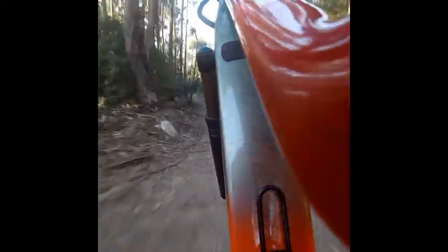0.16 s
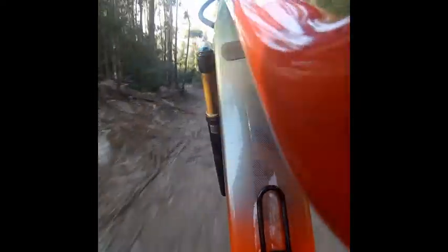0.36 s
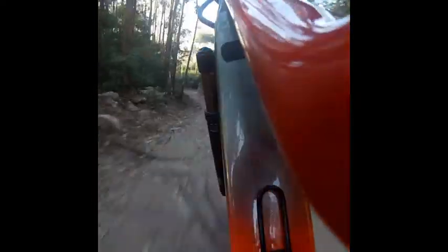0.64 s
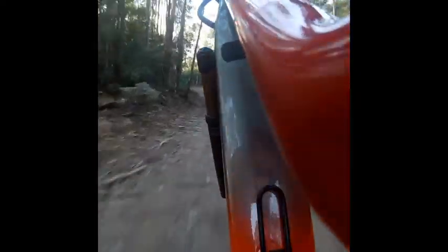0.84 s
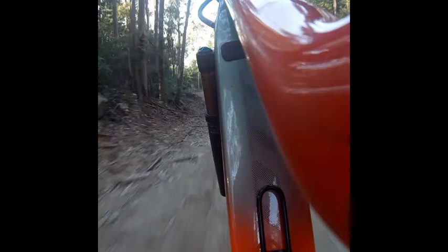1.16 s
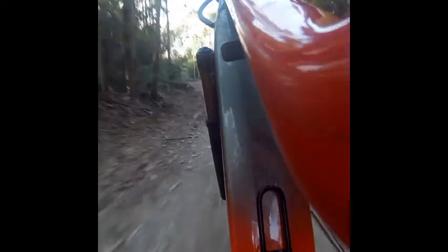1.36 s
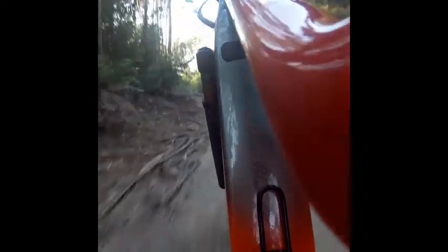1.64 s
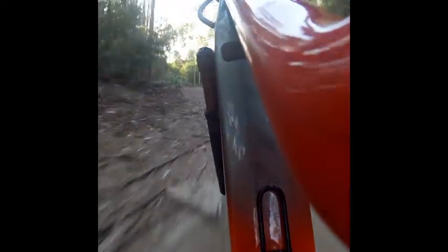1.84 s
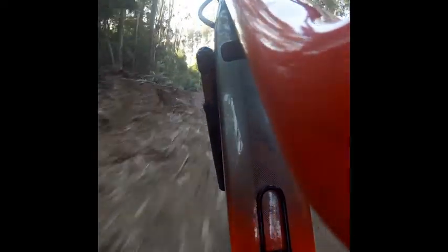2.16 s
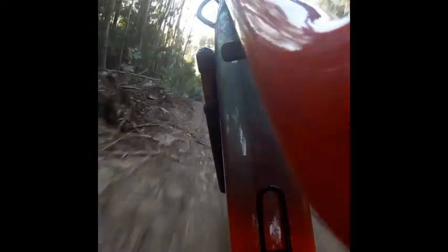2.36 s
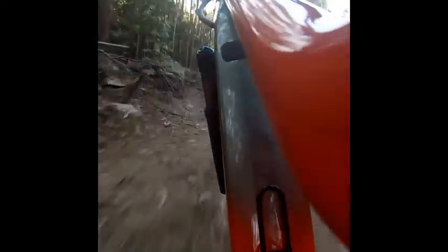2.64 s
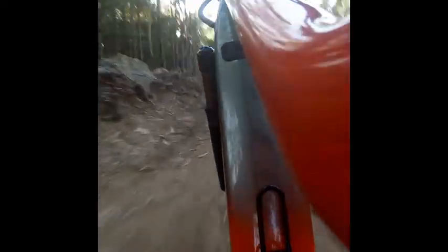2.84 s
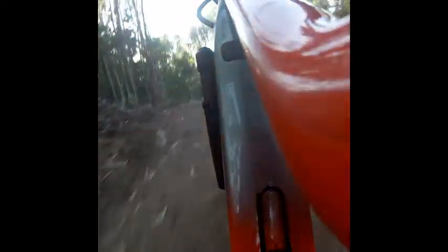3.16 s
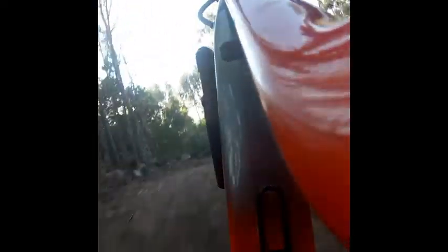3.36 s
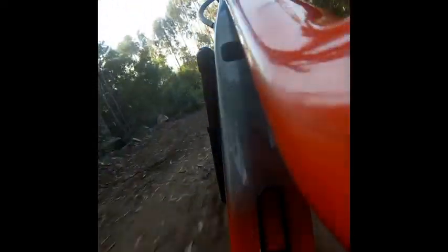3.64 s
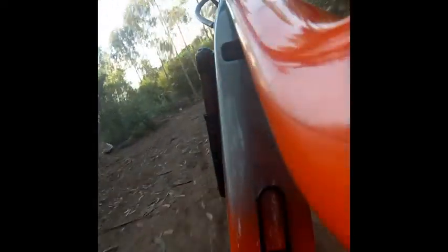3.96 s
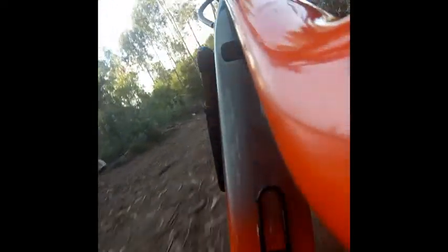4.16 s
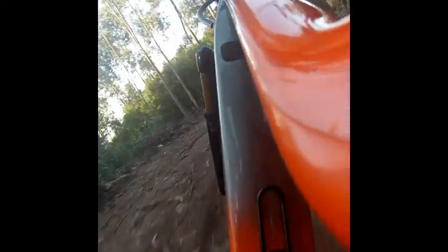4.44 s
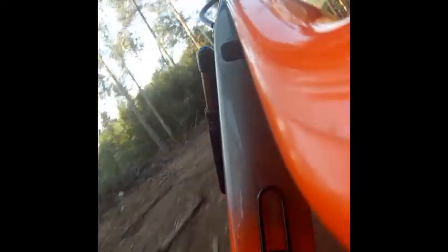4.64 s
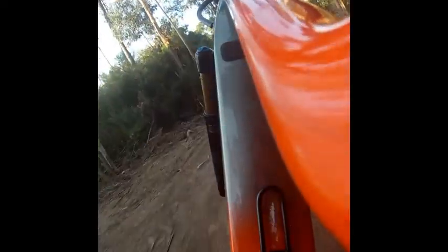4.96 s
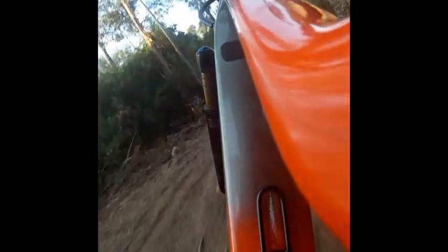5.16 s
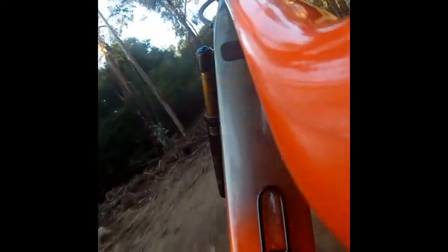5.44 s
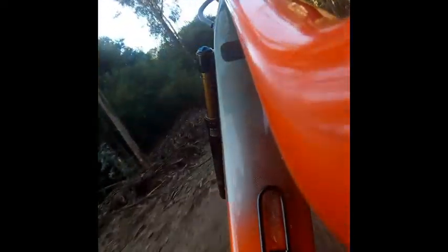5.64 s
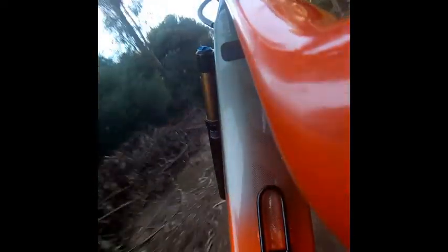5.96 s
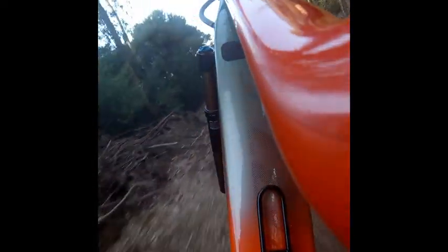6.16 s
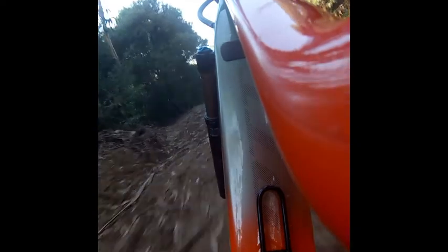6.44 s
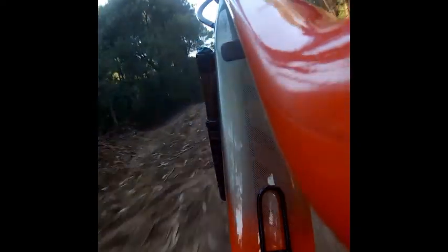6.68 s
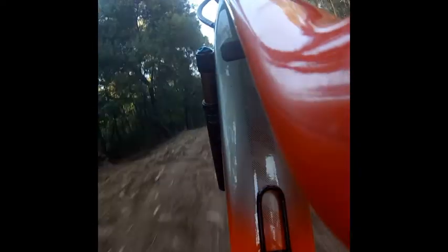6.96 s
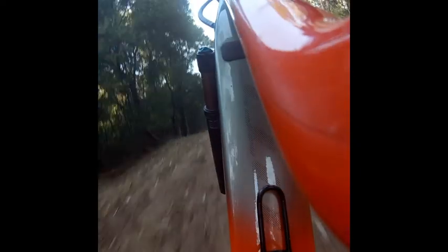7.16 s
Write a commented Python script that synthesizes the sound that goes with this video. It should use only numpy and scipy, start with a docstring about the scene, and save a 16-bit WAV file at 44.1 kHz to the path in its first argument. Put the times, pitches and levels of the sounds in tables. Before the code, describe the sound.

A mountain bike runs fast down a stony forest trail, heard from a closed microphone case on the frame. Low tyre rumble, gravel crunch and spraying grit dominate, with dense dull knocks and clicks. A hard thump hits the case around three seconds; the tyres go light, scuff the dirt twice, then roll on more quietly with snapping debris and a last rougher stretch.

```python
"""Tyres rumble and crunch over stones as a mountain bike runs down a rough dirt trail.
Random stone contacts and soil noise, shaped by filters, make the rolling; grit sprays the frame.
Bumps knock the bike, loose parts click, and debris snaps: short pushes, noise bursts and dying rings.
After a light moment over a crest both tyres scuff the dirt; one hard jolt thumps the case itself.
All of it is heard by one microphone in a closed case on the frame, over a faint hiss."""
import sys
import numpy as np
from scipy import signal
from scipy.fft import rfft, irfft, next_fast_len
from scipy.io import wavfile
from scipy.ndimage import map_coordinates

SR = 44100
rng = np.random.default_rng(int(sys.argv[2]) if len(sys.argv) > 2 else 0)


def to_wav(sig):
    """Store sig (one row per channel, or 1-D mono) as 16-bit WAV at the path in sys.argv[1].

    Samples outside -1..1 are clipped; the rate is SR.
    """
    pcm = np.clip(np.atleast_2d(sig), -1, 1) * 32767
    pcm = np.round(pcm).astype(np.int16)
    wavfile.write(sys.argv[1], SR, pcm.T)  # frames by channels


N = 322371

# Filter for fine grit. Each row: frequency in Hz, gain in dB.
GRIT_TONE = [(1000, -44.5), (1700, -3), (2800, -4), (4200, -10), (5900, -29), (7000, -41), (8500, -41.5),
             (10000, -51), (13000, -57.5), (16000, -77.5)]
# Roots and rocks that knock the frame.
# Each row: time in seconds, level in dB before the shared knock gain, hardness from 0 to 1.
OBSTACLES = [(0.077, -7, 0.33), (0.117, -9.5, 0.3), (0.2245, -13.5, .7), (0.325, -14.5, 0.83),
             (0.4777, -7.5, 0.27), (0.602, -8, .3), (0.647, -9.5, 0.9), (0.7143, -7.5, 0.55),
             (1.261, -9, 0.06), (1.567, -9, 0.9), (1.6465, -7.5, 0), (1.6678, -8.5, 0.3), (2.127, -9, 0.5),
             (2.146, -8, 0.3), (2.4249, -16, 0.97), (2.572, -8.5, 0.2), (2.5871, -6.5, 0.25),
             (2.624, -9, 0.6), (2.6987, -11, 0.3), (2.718, -10, 0.55), (2.763, -8.5, 0.4),
             (3.136, -11.5, 0.5), (3.41, -17.5, .1), (3.4635, -18, 0.6), (3.778, -19.5, 0.1),
             (3.917, -13.5, 0.1), (4.117, -14, 0.5), (4.924, -20, 0), (5.0933, -15.5, 0.1),
             (5.586, -17.5, 0.4), (5.932, -14, 0.02), (6.18, -14.5, 1), (6.628, -18.5, 0.15),
             (6.7657, -17, 0.3), (6.803, -15, 0.3), (6.884, -13.5, 0.8), (6.9224, -12, 1),
             (6.9955, -10.5, 0.27), (7.082, -16, .4), (7.1113, -17, 0.1)]
# Filter for the crack of a hard rock or of snapping debris. Each row: frequency in Hz, gain in dB.
CRACK_TONE = [(400, -18.5), (1300, 9.5), (2600, -2.5), (4000, -15.5), (5500, -30.5), (7000, -43.5),
              (12000, -66)]

# levels at cruising pace, before the ground changes them
CRUISE_DB, CRUNCH_DB, GRIT_DB = -30, -35, -51.5  # rumble, crunch, grit


def amp(db):
    """Turn decibels into a gain."""
    return 10 ** (np.asarray(db) / 20)


def unit(x):
    """Scale to rms 1."""
    return x / np.sqrt(np.mean(x ** 2) + 1e-20)


def crest(x):
    """Scale to peak 1."""
    return x / (np.abs(x).max() + 1e-20)


def add(track, s, sound):
    """Mix a sound into the track at time s."""
    part = track[max(round(s * SR), 0):][:len(sound)]
    part += sound[:len(part)]


def wobble(rate):
    """A smooth random curve through `rate` random points a second."""
    points = rng.standard_normal(int(N * rate / SR) + 4)
    return unit(map_coordinates(points, [np.arange(N) * rate / SR]))


def curves(rows):
    """One value per sample for each column after the time."""
    s, *columns = np.transpose(rows)
    return [np.interp(np.arange(N) / SR, s, column) for column in columns]


def stretch(start, length, rise_s=0.012, fall_s=0.2):
    """Rise, hold and fall (0-1), as when the tyres roll in and out of a stretch of ground."""
    t = np.arange(N) / SR - start
    rise = np.clip(t / rise_s + .5, 0, 1)
    return rise * np.clip((length - t) / fall_s + .5, 0, 1)


def filtered(x, gain_db):
    """Filter without pre-echo (minimum phase), its gain in dB a function of frequency."""
    m = 2 * next_fast_len(len(x) // 2 + 4096)
    gain = np.maximum(amp(gain_db(np.fft.rfftfreq(m, 1 / SR))), 1e-6)
    cepstrum = irfft(np.log(gain))
    # folding the cepstrum onto positive time makes the filter respond only after its input
    cepstrum[1:m // 2] *= 2
    cepstrum[m // 2 + 1:] = 0
    return irfft(rfft(x, m) * np.exp(rfft(cepstrum)))[:len(x)]


def coloured(x, points):
    """Pass x through a body with the given (Hz, dB) gains."""
    f, db = np.transpose(points)
    return filtered(x, lambda hz: np.interp(np.log(hz + 1), np.log(f), db))


def resonant(x, peaks):
    """Pass x through (Hz, width Hz, dB) peaks and notches."""
    return filtered(x, lambda hz: sum(db / (1 + (2 * (hz - centre) / width) ** 2)
                                      for centre, width, db in peaks))


def scattered(rate, level_db, spread_db):
    """Rows (s, dB) of chance hits, one in each time slot, up to spread_db under a level curve."""
    count = int(rate * N / SR)
    when, weak = rng.random((count, 2)).T
    at = ((np.arange(count) + when) / count * N).astype(int)
    return list(zip(at / SR, level_db[at] - spread_db * weak))


def contacts(rate, spread_db, t60):
    """Random stone contacts of uneven force, each a sharp push and a short dying crackle."""
    count = int(rate * N / SR)
    t = np.arange(SR // 100) / SR
    start = rng.integers(0, N, count)
    force = amp(-spread_db * rng.random(count))
    crackle = rng.standard_normal((count, len(t))) * amp(-60 * t / t60)
    crackle[:, 0] += 4.4 * rng.choice([-1, 1], count)  # the first push, either way
    index = start[:, None] + np.arange(len(t))
    return unit(np.bincount(index.ravel(), (force[:, None] * crackle).ravel(), N)[:N])


def pings(rate, centre_hz, spread_db, t60):
    """Flung grains strike hard parts; each rings for a moment at its own pitch."""
    count = int(rate * N / SR)
    t = np.arange(SR // 50) / SR
    when, pitch, force = rng.random((count, 3)).T
    hz = centre_hz * 2 ** (1.6 * (pitch[:, None] - .5))  # spread over 1.6 octaves
    grains = amp(-spread_db * force[:, None]) * np.sin(2 * np.pi * hz * t) * amp(-60 * t / t60)
    index = (when[:, None] * N).astype(int) + np.arange(len(t))
    return unit(np.bincount(index.ravel(), grains.ravel(), N)[:N])


def rolling(spectrum, stones, soil_db):
    """Stone contacts on a smooth bed of soil noise, heard through the bike."""
    return unit(coloured(stones + amp(soil_db) * rng.standard_normal(N), spectrum))


def tyres(rumble_db, crunch_db, grit_db):
    """Boom, rumble, crunch and grit swell as the tyre load judders, most unevenly at low levels."""
    # Filters for the soft tyres, the frame and crushed gravel. Each row: frequency in Hz, gain in dB.
    boom_tone = [(25, -41), (60, -18), (120, -8.5), (180, 1), (260, -2.5), (450, -30), (1200, -90.5)]
    rumble_tone = [(18, -78), (30, -46.5), (233, -2), (350, -0.5), (495, -1.5), (639, -2), (700, -2.5),
                   (778, -4), (1100, -10.5), (1430, -23), (2420, -120)]
    crunch_tone = [(470, -33.5), (800, -11), (1470, -2.5), (1750, -5), (2820, -18.5), (3400, -26),
                   (4420, -39.5), (7480, -120)]
    # A more hollow tone after the landing. Each row: centre in Hz, width in Hz, gain in dB.
    hollow_tone = [(890, 320, -1), (1436, 280, 1), (5330, 420, -5)]
    hollow_s = 3.65
    judder_db, judder_blurs = 1.47, 0.088  # swing at cruising pace; share lost per dB of rumble
    crunch_judder = 1.3  # gravel and grit answer the load more strongly: dB per dB
    boom_level_db, boom_grows = -47, 0.55  # level at cruising pace; dB gained per dB of rumble

    spurts_db = 1.2 * wobble(24)  # sand flies in spurts
    judder = np.tanh(unit(wobble(42) + 0.7 * wobble(110)))
    above_cruise_db = rumble_db - CRUISE_DB
    load_db = judder_db * np.exp(-judder_blurs * above_cruise_db) * judder  # at speed the bumps blur

    stones = contacts(rate=420, spread_db=14, t60=0.006)
    gravel = contacts(rate=520, spread_db=20, t60=0.004)
    sand = pings(rate=420, centre_hz=5200, spread_db=26.5, t60=0.0036)
    pebbles = pings(rate=220, centre_hz=1785, spread_db=14, t60=0.009)
    crushed = unit(stones + 0.95 * gravel + 0.48 * pebbles)
    flung = unit(0.73 * sand + gravel + 0.45 * stones)

    boom_gain = amp(boom_level_db + boom_grows * above_cruise_db + load_db)
    boom = boom_gain * rolling(boom_tone, stones, soil_db=0.5)
    rumble = amp(rumble_db + load_db) * rolling(rumble_tone, stones, soil_db=1.0)
    crunch_gain = amp(crunch_db + crunch_judder * load_db)
    crunch = crunch_gain * rolling(crunch_tone, crushed, soil_db=2.5)
    grit_gain = amp(grit_db + spurts_db + crunch_judder * load_db)
    grit = grit_gain * rolling(GRIT_TONE, flung, soil_db=0.5)
    roll = boom + rumble + crunch + grit
    return roll + stretch(hollow_s, N / SR) * (resonant(roll, hollow_tone) - roll)


def ground():
    """Levels in dB of rumble, crunch and grit: they grow with pace and on stones, and drop over crests."""
    # The pace of the ride. Each row: time in seconds, rumble level on plain dirt in dB.
    pace = [(0, -28), (2.3, -26.5), (2.9, -28.5), (3.3, -27.5), (3.52, -35.5), (4.3, -33.5), (4.8, -35),
            (5.4, -37.5), (5.78, -35.5), (6.05, -32), (6.42, -35.5), (7.0, -30.5), (7.31, -32.5)]
    # Stony ground. Each row: start in seconds, length in seconds, extra rumble in dB,
    # extra crunch and grit in dB.
    patches = [(0.0, 0.15, 3.5, 2.5), (0.462, 0.25, 3, 3), (0.742, 0.2, 2.5, .5), (1.1, 0.14, 3, 1.5),
               (1.537, 0.18, 2, 4), (2.556, 0.21, 4.5, 5), (2.819, 0.11, 2, 4), (3.048, 0.071, 2, 5),
               (3.168, 0.04, 3.5, 2.5), (3.53, 0.025, 5.5, 1), (4.078, 0.22, 2, 4), (5.074, 0.23, 3, 2.5),
               (6.155, 0.11, 3.5, 8), (6.863, 0.12, 5, 6)]
    # Loose sand thrown up, less on bare ground. Each row: start in seconds, length in seconds,
    # extra grit in dB.
    loose_sand = [(0.007, 0.82, 3.5), (0.907, 1.43, 2.5), (3.47, 0.13, -5.5), (3.658, 0.35, 6),
                  (4.553, 0.45, 5), (7.152, 0.22, 3.5)]
    # The bike goes light over a crest. Each row: landing in seconds, time spent light in seconds,
    # rumble drop in dB.
    crests = [(1.11, 0.096, 1.5), (2.424, 0.065, 4.5), (3.640, 0.083, 3.5), (5.79, 0.065, 2.5),
              (5.997, 0.1, 3.5)]
    unload_s, land_s = 0.055, .012  # the weight leaves the tyres slowly and comes back fast
    # brief dip in the rolling before each listed knock: time, rumble drop, edge
    dip_s, dip_db, dip_edge_s = .018, 1, 0.0036
    crunch_grows, grit_grows = 0.8, 0.94  # dB gained per dB of pace
    crunch_light, grit_light = 1.25, 0.26  # dB lost per dB of rumble drop; the grit loses both

    pace_db = curves(pace)[0] - CRUISE_DB
    drop_db = sum(db * stretch(landing - length, length, unload_s, land_s)
                  for landing, length, db in crests)
    dips = sum(stretch(s - dip_s, dip_s, dip_edge_s, dip_edge_s) for s, _, _ in OBSTACLES)
    drop_db = drop_db + dip_db * dips
    shake_db = -drop_db
    crush_db = -crunch_light * drop_db  # the crunch drops further than the rumble
    for s, length, rumble_db, crunch_db in patches:
        stony = stretch(s, length)
        shake_db = shake_db + rumble_db * stony
        crush_db = crush_db + crunch_db * stony
    sand_db = sum(db * stretch(s, length) for s, length, db in loose_sand)
    return (CRUISE_DB + pace_db + shake_db,
            CRUNCH_DB + crunch_grows * pace_db + crush_db,
            GRIT_DB + grit_grows * pace_db + crush_db + sand_db - grit_light * drop_db)


def blow(spectrum, t60, rattle):
    """One push and a brief rattle after it, through the frame; peak 1."""
    t = np.arange(SR // 12) / SR
    force = rattle * rng.standard_normal(len(t)) * amp(-60 * t / t60)
    force[0] += 1
    return crest(coloured(force, spectrum))


def knocks(rumble_db):
    """Roots and rocks knock the frame over a dull tyre thud; the harder, the more crack."""
    # Filters for the knocked frame and the thudding tyre. Each row: frequency in Hz, gain in dB.
    knock_tone = [(60, -34), (150, -11.5), (300, -2), (550, 2.5), (1000, 3), (1600, -11), (2800, -30),
                  (4500, -38), (6500, -56), (12000, -85)]
    thud_tone = [(50, -48), (150, -7.5), (280, -2), (500, 4), (900, -9), (5000, -86)]
    knock_db = -3  # gain of every knock
    thud_db, crack_db = -1.5, -3  # softest obstacle's thud and hardest one's crack, over the knock
    out = np.zeros(N)
    # lesser bumps follow the rumble: 5.6 a second, over a range of 8 dB
    bumps = scattered(5.6, rumble_db + 7.5, 8)
    lesser = [(s, db, 0.75) for s, db in bumps]
    for s, db, hardness in list(OBSTACLES) + lesser:
        # no two obstacles sound alike: pitch varies over .45 octave
        pitch = [2 ** (.45 * (rng.random() - .5)), 1]
        knock = blow(np.multiply(knock_tone, pitch), t60=0.016, rattle=0.13)
        thud = (1 - hardness) * amp(thud_db) * blow(thud_tone, t60=0.026, rattle=0.4)
        crack = blow(np.multiply(CRACK_TONE, pitch), t60=0.021, rattle=0.25)
        hit = crest(knock + thud) + hardness * amp(crack_db) * crack
        add(out, s + 0.00051, amp(db + knock_db) * hit)
    return out


def scuffs():
    """Each tyre tears briefly through loose gravel as it takes the weight again, hardest at first."""
    # Front and rear tyre bite into the dirt. Each row: start in seconds, length in seconds,
    # level in dB before it sags.
    bites = [(3.654, .026, -25), (3.706, .032, -23.5)]
    # Filter for the torn dirt. Each row: frequency in Hz, gain in dB.
    scuff_tone = [(200, -23.5), (540, 6), (900, 0), (1300, 4.5), (2250, -1.5), (2900, -17.5), (4000, -20.5),
                  (6000, -58), (12000, -84)]
    rise_s, fall_s, sag_db_per_s = .003, .005, 132
    bite = np.zeros(N)
    for s, length, db in bites:
        t = np.maximum(np.arange(N) / SR - s, 0)
        rise = np.minimum(t / rise_s, 1)
        fall = np.exp(-np.maximum(t - length, 0) / fall_s)
        bite += amp(db - sag_db_per_s * t) * rise * fall
    gravel = contacts(rate=2000, spread_db=2, t60=.006)
    return bite * rolling(scuff_tone, gravel, soil_db=0)


def jolt(width=0.00046):
    """A short pressure push, one-sided before filtering, as the case is jarred, with a short crack."""
    jolt_s, push_db, crack_db = 3.0695, -2.8, -7.5
    out, u = np.zeros(N), np.arange(SR // 50) / SR / width
    push = coloured(u ** 2 * np.exp(-2 * u), [(3500, -7), (6500, -44)])
    crack_tone = [(500, -1.0), (2400, 0.0), (3800, -12.5), (5000, -42), (8000, -70)]
    crack = blow(crack_tone, t60=0.007, rattle=0.08)
    add(out, jolt_s, amp(push_db) * crest(push))
    add(out, jolt_s - .0004, amp(crack_db) * crack)
    return out


def strike():
    """A flung stone cracks against the frame tube, rings it and touches it once more."""
    # Ringing tones of the frame tube. Each row: pitch in Hz, relative level in dB,
    # time to fall by 60 dB in seconds.
    tube = [(1280, 1, 0.036), (2230, -2, .03), (3500, -10, .026), (5300, -15, .014)]
    strike_s, strike_db = 5.8277, -17
    rebound_s, rebound_db = 0.0063, -9  # delay and level relative to the first hit
    out, t = np.zeros(N), np.arange(SR // 12) / SR
    modes = sum(amp(db - 60 * t / t60) * np.sin(2 * np.pi * hz * t) for hz, db, t60 in tube)
    ring = crest(modes * (1 - np.exp(-t / 0.0003)))
    for s, db in [(strike_s, strike_db), (strike_s + rebound_s, strike_db + rebound_db)]:
        add(out, s, amp(db) * crest(ring + 0.5 * blow(GRIT_TONE, t60=0.018, rattle=0.7)))
    return out


def ticks(rows, ring_t60, crack_t60, crack, gain_db):
    """Hard little hits: a crack of noise and one quickly damped resonance."""
    out, t = np.zeros(N), np.arange(SR // 20) / SR
    for s, db, hz in rows:
        ring = np.sin(2 * np.pi * hz * t) * amp(-60 * t / ring_t60) * (1 - np.exp(-t / 0.00033))
        noise = rng.standard_normal(len(t)) * amp(-60 * t / crack_t60)
        burst = crest(coloured(noise, GRIT_TONE))
        add(out, s + 0.00067, amp(db + gain_db) * crest(ring + crack * burst))
    return out


def clicks(grit_db):
    """A few sharp clicks on the frame, and lesser ones that follow the flying grit."""
    # Stones and loose parts that click. Each row: time in seconds, level in dB before
    # the shared click gain, pitch in Hz.
    parts = [(0.5122, -18, 2830), (1.867, -20, 4100), (2.2365, -21, 3700), (2.9672, -20, 4200),
             (3.3635, -29, 5100), (3.5026, -21.5, 4200), (4.6875, -25, 4100), (4.8078, -26, 4100),
             (6.1925, -21, 3800)]
    middle_hz, octaves = 3040, 0.86  # middle pitch of the lesser clicks and its range
    # 5 lesser clicks a second, over a range of 7 dB
    lesser = [(s, db, middle_hz * 2 ** (octaves * (rng.random() - .5)))
              for s, db in scattered(5, grit_db + 19.5, 7)]
    return ticks(parts + lesser, ring_t60=0.01, crack_t60=0.007, crack=0.9, gain_db=-7.5)


def snaps():
    """Debris breaks under the tread with a dry crack and a short, hollow ring."""
    # Twigs and pebbles snapping. Each row: time in seconds, peak level in dB, pitch in Hz.
    debris = [(3.4212, -24, 2100), (4.648, -22, 1400), (4.721, -19.5, 1540), (6.685, -24.5, 2000),
              (6.874, -20, 2150), (7.061, -22, 1410)]
    out, t = np.zeros(N), np.arange(SR // 12) / SR
    for s, db, hz in debris:
        ring = np.sin(2 * np.pi * hz * t) * amp(-60 * t / 0.024) * (1 - np.exp(-t / 0.0005))
        crack = blow(CRACK_TONE, t60=0.018, rattle=0.57)
        add(out, s, amp(db) * crest(1.9 * ring + crack))
    return out


def spatter(grit_db):
    """Single sand grains tick against the case, louder with flying grit and in showers."""
    # Filter for sharp sand grains. Each row: frequency in Hz, gain in dB.
    grain_tone = [(1500, -32.5), (4000, -4.5), (6000, -3.5), (7200, -14), (9000, -20.5), (11000, -31),
                  (15000, -55.5)]
    # Showers that reach the case. Each row: start in seconds, length in seconds, extra spatter in dB.
    showers = [(0.03, 0.44, 5.5), (0.457, 0.47, 6), (1.45, 0.48, 5)]
    level_db, grows = -76, 0.98  # level at cruising pace; dB gained per dB of grit
    sand = contacts(rate=80, spread_db=22, t60=0.012)
    shower_db = sum(db * stretch(s, length) for s, length, db in showers)
    gain = amp(level_db + grows * (grit_db - GRIT_DB) + shower_db)
    return gain * unit(coloured(sand, grain_tone))


def hiss():
    """The microphone's faint steady hiss: plain white noise."""
    return amp(-91.0) * rng.standard_normal(N)


def scene():
    """Add up the rolling tyres, the scuffs, all the hits and the faint hiss."""
    rumble_db, crunch_db, grit_db = ground()
    hits = knocks(rumble_db) + clicks(grit_db) + spatter(grit_db) + snaps() + strike() + jolt()
    return (tyres(rumble_db, crunch_db, grit_db) + scuffs() + hits + hiss())[None]


def record(dry):
    """The case colours the sound, the end fades, and a steep filter removes the highest treble."""
    # Peaks and notches of the case. Each row: centre in Hz, width in Hz, gain in dB.
    case = [(488, 270, 2.5), (699, 20, -12), (1748, 385, -4.5), (2840, 150, 2.5), (3710, 130, 4),
            (4830, 210, 5), (5730, 160, 3), (6500, 370, -20), (7500, 320, -9)]
    top_hz, fade_s = 15700, .01
    fade = np.minimum(np.arange(N)[::-1] / (fade_s * SR), 1)
    boxed = resonant(dry[0], case) * fade
    low_pass = signal.ellip(12, .1, 80, top_hz, fs=SR, output="sos")
    return signal.sosfilt(low_pass, boxed)[None]


dry = scene()
out = record(dry)
to_wav(out)
```